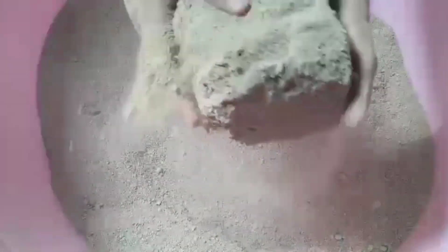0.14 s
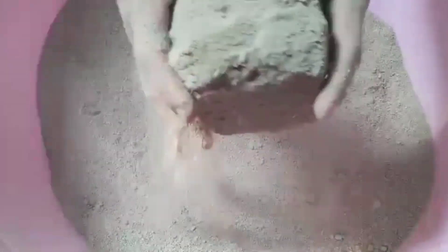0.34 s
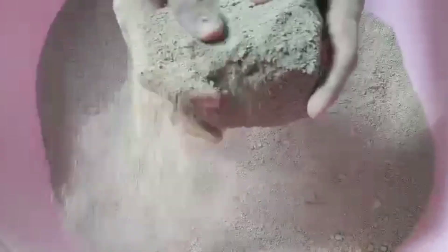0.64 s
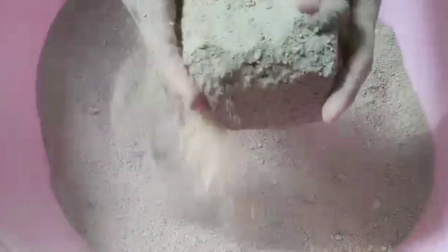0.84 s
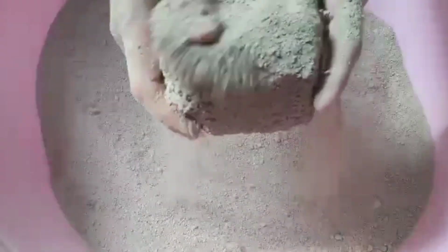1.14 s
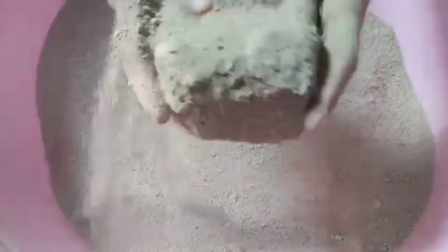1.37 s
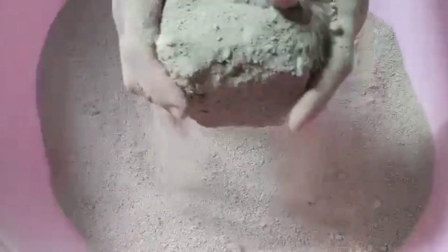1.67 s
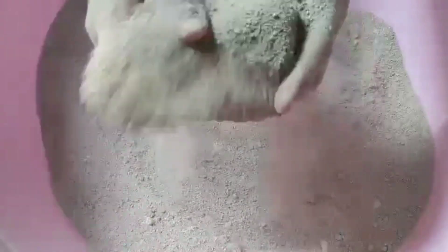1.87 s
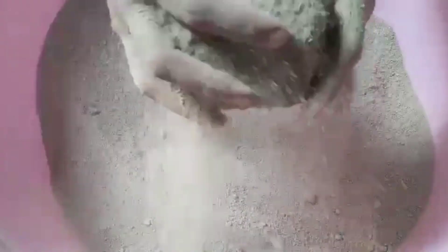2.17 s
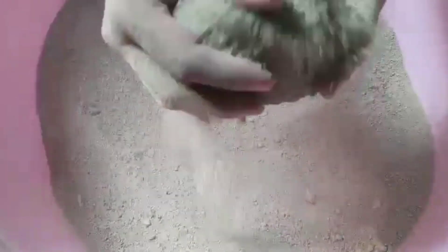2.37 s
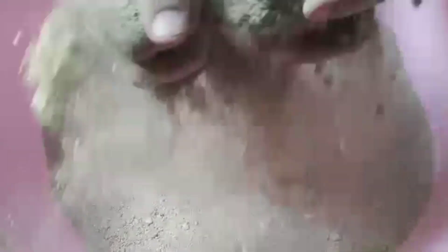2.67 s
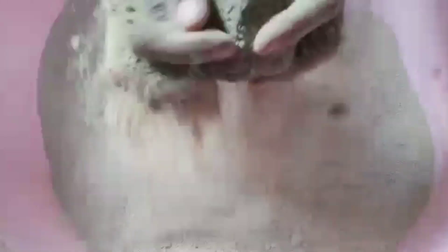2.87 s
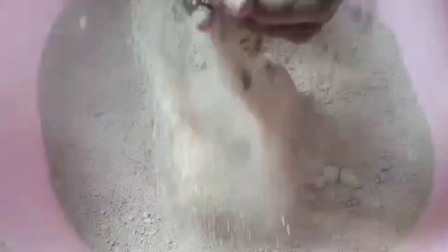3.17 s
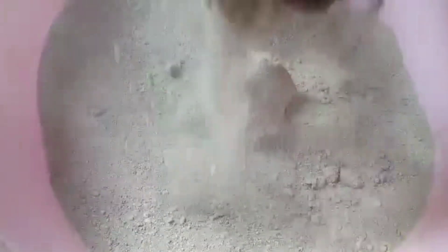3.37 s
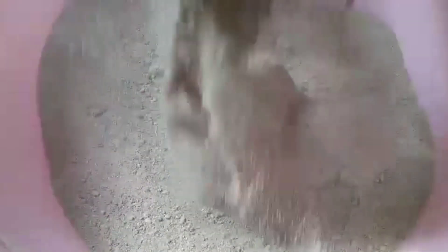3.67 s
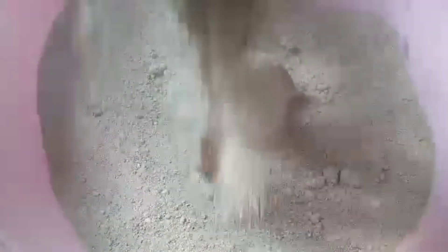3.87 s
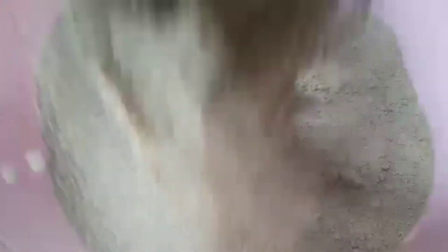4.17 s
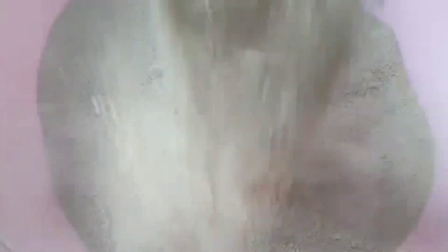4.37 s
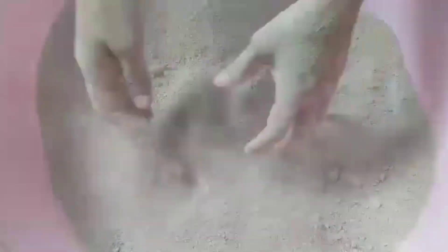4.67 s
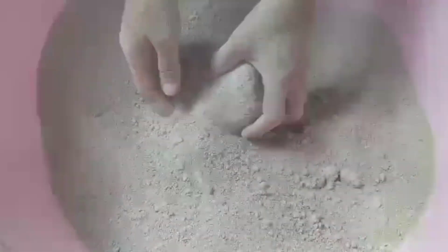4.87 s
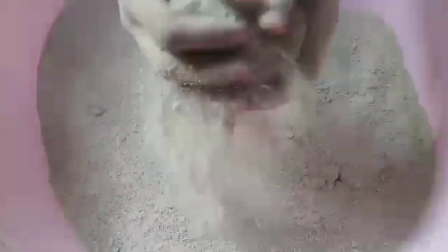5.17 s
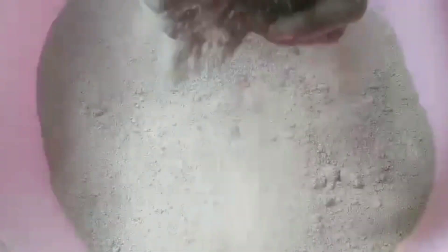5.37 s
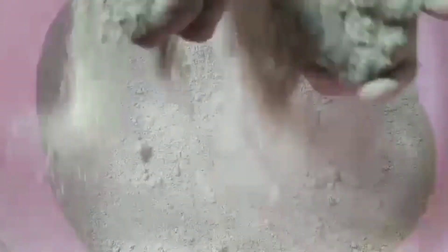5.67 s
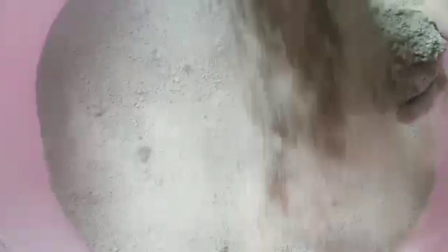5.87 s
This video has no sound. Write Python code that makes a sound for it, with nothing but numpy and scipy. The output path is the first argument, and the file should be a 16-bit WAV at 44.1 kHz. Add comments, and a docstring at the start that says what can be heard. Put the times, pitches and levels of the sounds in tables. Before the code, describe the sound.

Dry sand crunches and breaks apart close up, grains pouring and lumps thudding softly into a plastic basin.

```python
"""Dry sand crumbles between two hands over a plastic basin, close up in a small room.
Grains rub and pour in a gritty hiss, crumbs snap off in short bursts, and at 2.8 s the block caves in.
Lumps thud into the loose sand, which jostles softly underneath. The basin's walls colour every crack,
its hollow rings under the coarse grains, and the room adds a short tail and a low rumble."""
import sys
import numpy as np
from scipy import signal
from scipy.fft import rfft, irfft
from scipy.io import wavfile

SR = 44100
rng = np.random.default_rng(int(sys.argv[2]) if len(sys.argv) > 2 else 0)


def int16_out(signal):
    """Quantize to a 16-bit WAV file."""
    q = np.round(np.clip(np.atleast_2d(signal).T, -1, 1) * 32767)
    wavfile.write(sys.argv[1], SR, q.astype(np.int16))


N = 266364
TIME = np.arange(N) / SR

# Palms rub or rake the block. Each row: start and length in seconds, relative hiss level in dB,
# grit offset from that level in dB.
RUBS = [(-0.1, 0.19, -43, -3.5), (0.125, 0.25, -40, -7.5), (0.41, 0.2, -43.5, -8.5),
        (0.653, 0.24, -35.5, -10), (0.878, 0.2, -44.5, -2), (1.038, 0.3, -41, -5),
        (1.313, 0.4, -38.5, -10.5), (1.588, 0.28, -42.5, -2.5), (1.795, 0.2, -40.5, -8),
        (2.123, 0.34, -42, -5), (2.416, 0.19, -37, -8), (2.613, 0.35, -33, -1.5), (3.168, 0.18, -45, -7),
        (3.288, 0.084, -38.5, -22), (3.573, 0.42, -47, -1), (4.435, 0.44, -46.5, -3.5),
        (4.887, 0.19, -41.5, -3.5), (5.089, 0.1, -42.5, -32), (5.605, 0.25, -41.5, -5.5),
        (5.872, 0.42, -34.5, -6)]
# A piece gives way and pours. Each row: start and hold in seconds, then hiss and grit as for the rubs.
SPILLS = [(0.361, 0.029, -38, 3), (1.389, 0.032, -35, -2), (1.526, 0.036, -49.5, 14),
          (2.039, 0.072, -31.5, -7), (2.331, 0.035, -36, -2.5), (2.567, 0.037, -30.5, -8),
          (2.841, 0.066, -31.5, 2.5), (3.469, 0.015, -31.5, -9), (4.093, 0.034, -40, -3.5),
          (4.141, 0.105, -31, -0.5), (4.281, 0.021, -38, 7), (5.339, 0.11, -30.5, -4),
          (5.761, 0.044, -38.5, 6.5)]
# Smooth under the palms, gritty as pieces fall. Each row: time in seconds, share of large grains 0-1.
GRIT_SHARE = [(0, 0), (1.3, 0.11), (2.5, 0.3), (2.8, 0.55), (3.5, 0.27), (4.2, 0.52), (4.7, 0.63),
              (5.1, 0.16), (6, 0.45)]
# The sand shifts dully under the hands. Each row: start and length in seconds, relative level in dB.
SHIFTS = [(1.352, 0.49, -52), (2.57, 0.6, -47.5), (3.676, 0.24, -58), (4.094, 1.14, -52.5),
          (5.182, 1.4, -52)]
# Crumbs break or land. Each row: start in seconds, relative levels of the sharp crack and the hollow
# knock in dB, knock pitch in Hz, decay time of the run of snaps in ms.
CRUMBS = [(0.3012, -36, -39.5, 1550, 0.3), (0.3708, -24, -23.5, 970, 0.63), (0.7337, -23.5, -35, 950, 0.62),
          (0.7637, -22, -34, 1190, 1.7), (1.4088, -16.5, -34, 1430, 2.9), (1.4953, -28, -36.5, 1880, 1),
          (1.5489, -23.5, -28.5, 980, 0.13), (1.6452, -29, -35, 920, 0.85), (2.028, -25, -38, 1800, 5.5),
          (2.0493, -26, -45, 1630, 0.25), (2.0598, -14.5, -34.5, 1900, 5.6),
          (2.0777, -17, -30.5, 1780, 1.9), (2.1527, -24, -27, 1010, 1), (2.3377, -15.5, -22, 1773, 2.8),
          (2.7285, -21.5, -36, 1040, 3.7), (2.7932, -26, -19, 824, 2.7), (2.8122, -29, -24, 1010, 1.2),
          (2.8557, -20, -46, 701, 0.62), (2.8938, -14.5, -21, 1620, 0.77), (2.9213, -22.5, -23.5, 940, 1.8),
          (2.9755, -30, -28.5, 1214, 3.7), (3.329, -31, -45, 1490, 3.7), (3.469, -29, -60, 1790, 5.4),
          (3.6539, -34.5, -49, 990, 0.28), (3.707, -30.5, -34.5, 930, 6.1),
          (4.1522, -21.5, -21.5, 1270, 5.1), (4.1981, -28, -30, 870, 0.89), (4.2395, -16, -25.5, 940, 2.5),
          (4.2951, -19, -23, 1340, 0.3), (4.3342, -28.5, -29.5, 1000, 1.8), (4.4219, -26, -44, 930, 0.91),
          (4.55, -32.5, -45, 855, 0.3), (4.5711, -34, -44.5, 865, 0.33), (4.628, -31, -42, 840, 4.8),
          (5.3247, -26.5, -43.5, 960, 2.3), (5.4441, -26, -33, 840, 1.8), (5.4697, -14.5, -18.5, 896, 1.9),
          (5.7318, -26, -34.5, 1180, 4.6), (5.766, -24.5, -34, 1010, 3.1), (5.7784, -28, -40, 1010, 0.83),
          (5.7885, -16, -19.5, 1280, 9), (5.9854, -22.5, -36, 930, 5.3)]
# Lumps give way or land. Each row: start in seconds, relative level in dB, starting pitch in Hz,
# seconds to fade by 60 dB.
LUMPS = [(1.546, -29.5, 427, 0.023), (2.644, -25.5, 171, 0.15), (2.663, -30, 359, 0.11),
         (2.664, -31.5, 58.3, 0.12), (2.7925, -19.5, 241, 0.1), (2.7933, -12, 560, 0.014),
         (2.844, -26.5, 266, 0.037), (3.764, -21.5, 242, 0.032), (4.152, -26.5, 465, 0.054),
         (5.586, -33, 270, 0.028)]
# Tone curves. Each row: frequency in Hz, relative level in dB.
HISS_EQ = [(500, -37), (1500, -9), (2500, -5), (3500, -3.5), (5000, -2.5), (6200, -2), (7400, 1),
           (8200, -6.5), (8800, -13.5), (9500, -37), (10500, -24), (12000, -21.5), (16000, -22.5)]  # fine grains sliding
PATTER_EQ = [(250, -23.5), (400, -7.5), (500, 1), (650, -1), (850, 2.5), (1300, 1.5), (1800, 1.5),
             (2500, -11), (4000, -5), (9000, -59)]  # large grains landing
CRACK_EQ = [(400, -23), (1200, -9), (2500, 5.5), (4000, 7.5), (5500, 9.5), (7000, 13.5), (8000, 7.5),
            (8800, -7), (9600, -12), (11500, -10), (16000, -10)]  # the bright edge of a break
KNOCK_EQ = [(120, -41), (300, -13.5), (480, -5.5), (750, 6.5), (1300, -0.5), (1800, 3.5), (2600, -5.5),
            (4500, -4.5), (9000, -57)]  # the hollow body of a break
THUD_EQ = [(40, -51), (100, -21), (150, -2), (235, -0.5), (320, -4.5), (470, 0.5), (700, -7.5), (2000, -49)]  # loose sand moving in bulk
RUMBLE_EQ = [(15, -18), (30, -28), (50, -13.5), (75, -5), (110, 1.5), (160, -2.5), (280, -16), (600, -20),
             (2000, -26), (8000, -65)]  # the room's low background
# The basin's hollow rings. Each row: pitch in Hz, width in Hz, level against the direct sound in dB.
BASIN_MODES = [(745, 120, -5.5), (1045, 130, -3), (1272, 55, -1.5)]
# Slaps off the sand bed and basin walls. Each row: average delay in ms, gain as a factor.
WALL_ECHOES = [(0.846, 0.19), (1.702, 0.18), (2.998, 0.26), (4.201, 0.3)]
# The room's tail. Each row: frequency in Hz, seconds to fade by 60 dB.
ROOM_DECAY = [(150, 0.36), (450, 0.37), (800, 0.31), (1200, 0.14), (4000, 0.64), (8000, 0.52),
              (16000, 0.51)]

SIFT_DB, SIFT_GRIT_DB = -50, -13.5  # dust sifts all the time: relative hiss level, grit offset


def gain_of(db):
    """Decibels to amplitude."""
    return 10 ** (np.asarray(db) / 20)


def unit_rms(x):
    """Scales to rms 1."""
    return x / np.sqrt(np.mean(x ** 2) + 1e-20)


def curve_at(points, hz):
    """Reads a curve along a logarithmic frequency axis."""
    freqs, values = np.transpose(points)
    return np.interp(np.log(hz + 1), np.log(freqs + 1), values)


def add(mix, start_s, sound):
    """Mixes a sound in at its start time."""
    part = mix[max(round(start_s * SR), 0):][:len(sound)]
    part += sound[:len(part)]


def colour(x, eq, size=4096):
    """Minimum-phase EQ, so that clicks keep their sharp fronts."""
    log_gain = np.log(gain_of(curve_at(eq, abs(np.fft.fftfreq(size, 1 / SR)))))
    pulse = np.fft.ifft(np.exp(np.conj(signal.hilbert(log_gain)))).real[:size // 2]
    return signal.oaconvolve(x, pulse)[:len(x)]


def wander(per_s):
    """Smooth random drift of rms 1 that changes about per_s times a second."""
    hz = np.fft.rfftfreq(N, 1 / SR)
    return unit_rms(irfft(rfft(rng.standard_normal(N)) / (1 + (hz / per_s) ** 2), N))


def grains(per_s, spread_db, limit):
    """Random contacts: many tiny ones and a few large ones."""
    size = gain_of(spread_db * np.minimum(rng.exponential(1, N), limit))
    return unit_rms(size * rng.choice([-1, 1], N) * (rng.random(N) < per_s / SR))


def hand_stroke(start, length, skew=0.66):
    """One movement of the hands swells and eases in an arch that peaks a little early."""
    phase = np.clip((TIME - start) / length, 0, 1)
    return abs(np.sin(np.pi * phase ** skew)) ** 1.07


def moving_sand():
    """Envelopes of the fine and the coarse grains; sifting, rubs and spills add in power."""
    fine, coarse = gain_of(SIFT_DB) ** 2, gain_of(SIFT_DB + SIFT_GRIT_DB) ** 2
    for envelope, rows in (hand_stroke, RUBS), (spill, SPILLS):
        for start, length, db, grit_db in rows:
            power = (gain_of(db) * envelope(start, length)) ** 2
            fine += power
            coarse += power * gain_of(grit_db) ** 2
    return np.sqrt(fine), np.sqrt(coarse)


def grit_share():
    """How much of the moving sand is large grains."""
    return np.interp(TIME, *np.transpose(GRIT_SHARE))


def sand_stream(fine, coarse, hiss_db, patter_db, fizz_db):
    """Sand rubs and pours in little avalanches; the larger grains also patter lower down."""
    clumps = unit_rms(gain_of(1.27 * wander(87) - 0.07 * wander(36)))
    dust = grains(per_s=24000, spread_db=1.5, limit=8.7)
    grit = grains(per_s=1300, spread_db=3.5, limit=3.9)
    share = grit_share()
    contacts = clumps * (np.sqrt(1 - share) * dust + np.sqrt(share) * grit)
    hiss = unit_rms(colour(contacts, HISS_EQ))
    flicker = unit_rms(gain_of(4.4 * wander(19)))
    fizz = flicker * clumps * grains(per_s=5900, spread_db=8, limit=3)
    # harder contacts are shorter, so the top end grows faster than the rest
    hiss += gain_of(fizz_db) * unit_rms(fine) * colour(fizz, [(9500, -12), (11500, 3.5)])
    landings = clumps * grains(per_s=3000, spread_db=0.5, limit=13)
    patter = unit_rms(basin_ring(colour(landings, PATTER_EQ)))
    return gain_of(hiss_db) * hiss * fine + gain_of(patter_db) * patter * coarse


def basin_ring(x):
    """The hollow of the basin rings briefly at a few pitches."""
    return x + sum(gain_of(db) * signal.lfilter(*signal.iirpeak(hz, hz / width, SR), x)
                   for hz, width, db in BASIN_MODES)


def sand_bed(trim_db, rest_db=-61):
    """Soft low jostling as sand settles in the basin and between the palms, never quite at rest."""
    shifting = sum((gain_of(db) * hand_stroke(start, length)) ** 2 for start, length, db in SHIFTS)
    jostle = unit_rms(colour(grains(per_s=900, spread_db=3, limit=3.9), THUD_EQ))
    return gain_of(trim_db) * np.sqrt(gain_of(rest_db) ** 2 + shifting) * jostle


def room_rumble(db):
    """The steady low background of the room."""
    return gain_of(db) * unit_rms(colour(rng.standard_normal(N), RUMBLE_EQ))


def room_tail(x, delay_s, treble_db):
    """Dense reflections start after a short gap and die soonest in the midrange."""
    taps = rng.standard_normal(SR // 2) * (rng.random(SR // 2) < .15)
    hz, t, bands = signal.stft(taps, SR, nperseg=256)
    fade = np.exp(-np.log(1000) * t / curve_at(ROOM_DECAY, hz)[:, None])
    tail = signal.istft(bands * fade, SR, nperseg=256)[1]
    tail = colour(tail / np.linalg.norm(tail), [(1500, 0), (5000, treble_db)])
    out = np.zeros(N)
    add(out, delay_s, signal.oaconvolve(x, tail))
    return out


def crumbs(rows, crack_trim_db, knock_trim_db, ring_db, ring_q, size=2048):
    """Each break is one snap and a quick run of smaller ones; the piece knocks at its own pitch."""
    t, out = np.arange(size) / SR, np.zeros(N)
    hz = np.fft.rfftfreq(size, 1 / SR)
    burst_scale = np.sqrt(.005 * SR / size)  # a break carries the energy of 5 ms at its level
    for start, crack_db, knock_db, pitch, run_ms in rows:
        snapping = rng.random(size) < .14
        heights = 0.95 * np.tanh(rng.standard_normal(size) / 2)
        snaps = snapping * heights * np.exp(-1000 * t / run_ms)
        snaps[0] = -1  # the first snap is the strongest
        ring = 1 + gain_of(ring_db) / (1 + (2 * ring_q * (hz / pitch - 1)) ** 2)
        crack = gain_of(crack_db + crack_trim_db) * unit_rms(gain_of(curve_at(CRACK_EQ, hz)))
        knock = gain_of(knock_db + knock_trim_db) * unit_rms(gain_of(curve_at(KNOCK_EQ, hz)) * ring)
        spectrum = np.hypot(crack, knock)
        sound = colour(basin_walls(snaps, spread=.2), np.c_[hz, 20 * np.log10(spectrum)])
        add(out, start, burst_scale * np.sqrt(np.mean(spectrum ** 2)) * unit_rms(sound))
    return out


def basin_walls(x, spread):
    """Close echoes; their delays depend on where in the basin the sound starts."""
    out = x.copy()
    for (delay_ms, gain), place in zip(WALL_ECHOES, rng.uniform(-1, 1, len(WALL_ECHOES))):
        add(out, delay_ms / 1000 * (1 + spread * place), gain * x)
    return out


def spill(start, hold, rise_s=0.018, fall_s=0.034, trickle_db=-3.5, trickle_s=0.078):
    """Sand pours at once, holds and soon runs out; the last grains trail after it."""
    after = np.maximum(TIME - start - hold, 0)
    trickle = gain_of(trickle_db) * np.exp(-after / trickle_s)
    fall = np.maximum(np.exp(-after / fall_s), trickle)
    return np.clip((TIME - start) / rise_s, 0, 1) * fall


def chips(fine, full_grit_per_s=54, over_sift_db=8.5, follow=0.75, centre_hz=1036, tries=600):
    """Small random breaks as crumb rows: more in gritty sand, standing out most in a thin trickle."""
    rows = []
    chance = grit_share() ** 2 * full_grit_per_s * N / SR / tries
    for luck, when, softness, tone in rng.random((tries, 4)):
        at = int(when * N)
        if luck < chance[at]:
            flow_db = 20 * np.log10(fine[at]) - SIFT_DB
            crack_db = SIFT_DB + over_sift_db + follow * flow_db + 2.5 * (1 - 2 * softness)
            rows.append((at / SR, crack_db, crack_db - 14, centre_hz * 2 ** (tone - .5), 1))
    return rows


def lumps(trim_db, roughness, sag):
    """A heavy lump makes a short, low, uneven push that sinks in pitch as the sand yields."""
    t, out = np.arange(SR // 4) / SR, np.zeros(N)
    for start, db, hz, t60 in LUMPS:
        fade = np.exp(-np.log(1000) * t / t60)
        pitch = hz * (1 - sag * np.minimum(t / t60, 1))
        push = fade * np.sin(2 * np.pi * np.cumsum(pitch) / SR)
        push = signal.lfilter(*signal.butter(2, hz / 2, "highpass", fs=SR), push)
        rubble = unit_rms(colour(fade * rng.standard_normal(len(t)), THUD_EQ)) * np.std(push)
        add(out, start, gain_of(db + trim_db) * (push + roughness * rubble))
    return out


def scene():
    """All the sand sits in the centre, with a little width in the top end."""
    fine, coarse = moving_sand()
    flow = sand_stream(fine, coarse, hiss_db=1.5, patter_db=-3.5, fizz_db=-19.5)
    bed = sand_bed(trim_db=1)
    rumble = room_rumble(db=-54)
    hits = lumps(trim_db=-0.5, roughness=0.33, sag=0.086)
    hits += crumbs(CRUMBS + chips(fine), crack_trim_db=-3, knock_trim_db=1, ring_db=9.5, ring_q=7.6)
    close = flow + hits + bed
    room_send = gain_of(-6.5) * hits + gain_of(-13.5) * flow
    middle = close + room_tail(room_send, delay_s=.012, treble_db=-3.5) + rumble
    air = room_tail(close, delay_s=.001, treble_db=-4.5)
    side = gain_of(-17.5) * colour(air, [(4000, -53), (7500, -58), (10000, 13)])
    return np.array([middle + side, middle - side])


def record(dry):
    """Clips at full scale, then cuts the treble above 16.1 kHz."""
    lowpass = signal.firwin(511, 16100, window=("kaiser", 9), fs=SR)
    return signal.oaconvolve(np.clip(dry, -1, 1), lowpass[None], "same")


dry = scene()
out = record(dry)
int16_out(out)
```